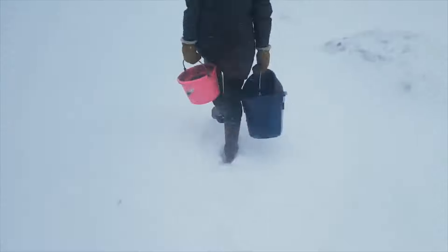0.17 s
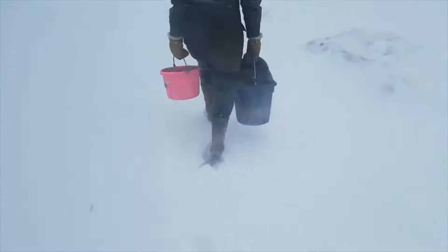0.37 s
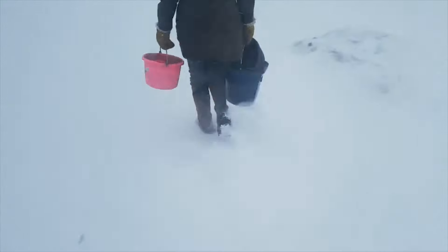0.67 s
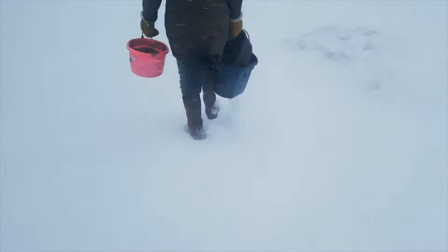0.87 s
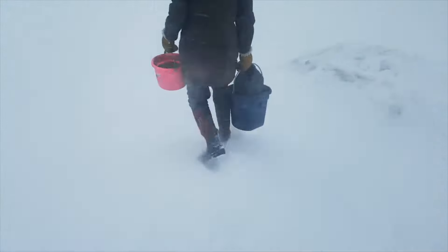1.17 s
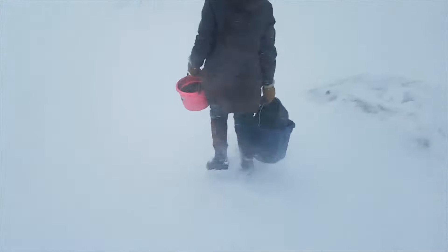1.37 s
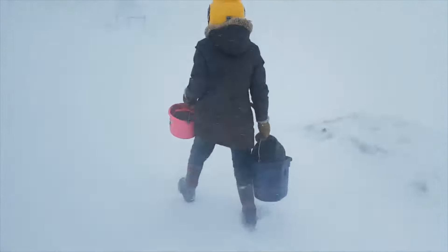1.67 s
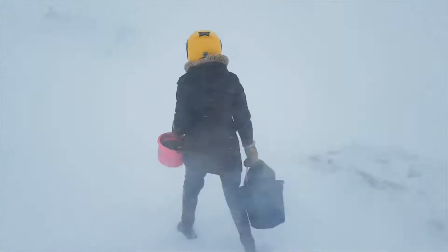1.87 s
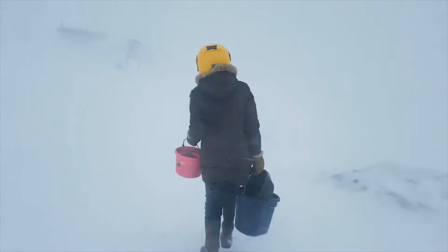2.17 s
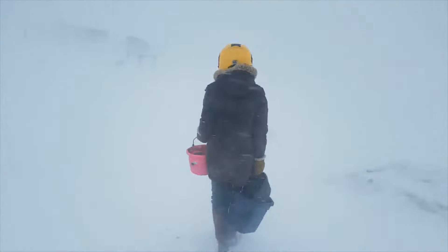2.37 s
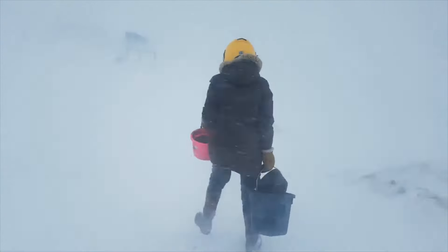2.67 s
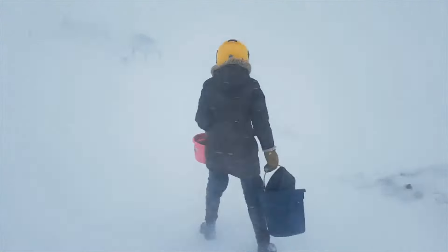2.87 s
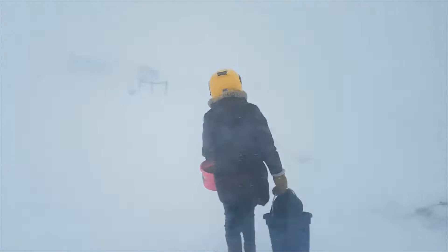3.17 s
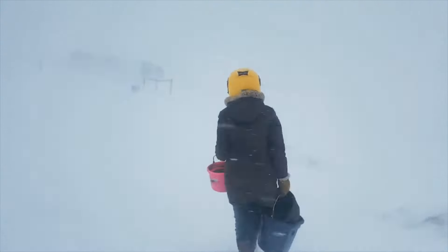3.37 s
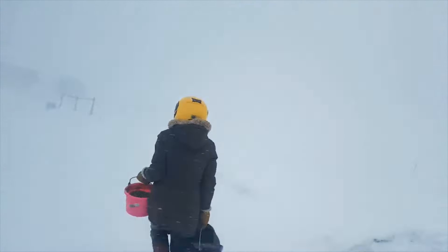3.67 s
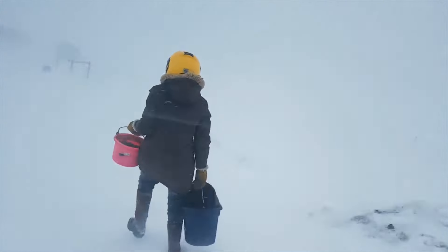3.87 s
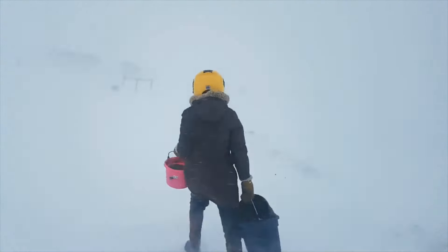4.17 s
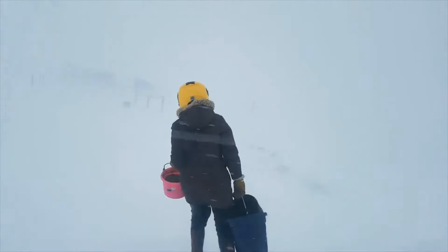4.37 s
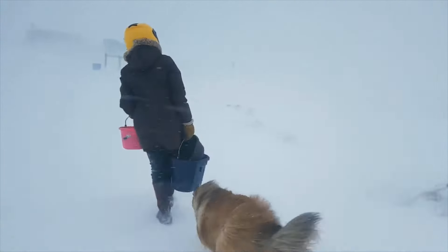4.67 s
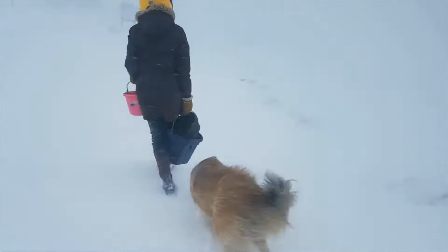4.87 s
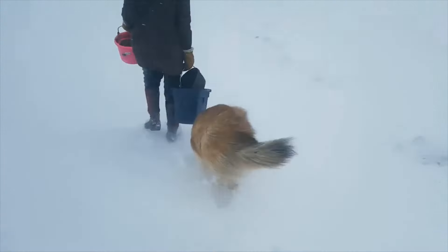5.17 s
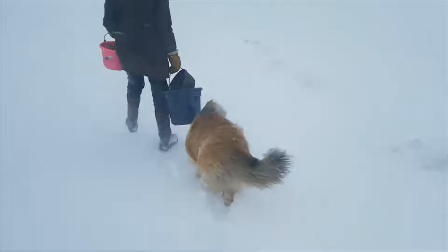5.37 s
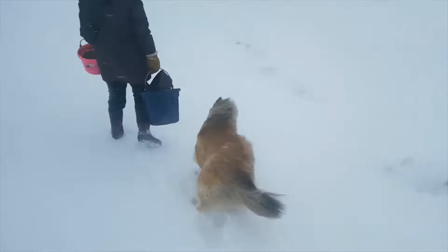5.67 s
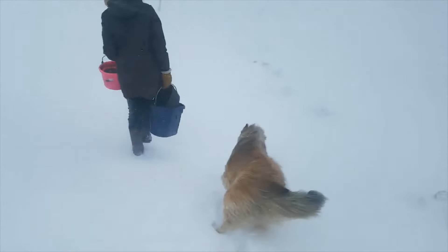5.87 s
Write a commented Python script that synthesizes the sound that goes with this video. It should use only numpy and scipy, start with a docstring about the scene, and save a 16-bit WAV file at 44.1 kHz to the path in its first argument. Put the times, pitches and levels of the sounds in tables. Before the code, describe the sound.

A blizzard blows directly over a stereo microphone in open snow, with no room echo. From 0 seconds, deep wind rumble and a rougher low roar fill both sides. The right is thick and nearly continuous; the left is unrelated, lurching between heavy surges and sudden lulls, such as around 0.3 seconds. Dry snow ticks strike the left, with stronger ones near 0.5 and 0.94. From about 1 to 2.5 seconds a gust tears across the left in ragged, hissing puffs with fizzing fine snow, strongest early, then thinning. Clicks follow near 2.4, with a tiny flurry around 3.3. A shorter gust hisses from 3.7 to 4.1. A heavy low thump of wind swells left near 4.3. More ticks scatter from 4.7 to 5.4. After about 5.5 the left drops back, and the right weakens toward 6 seconds. A very faint snow-drift hiss lies underneath.

```python
"""Deep, restless wind rumble and roar fill both sides as a blizzard blows over two microphone ports.
The right port sits in a steady stream and the left is buffeted unevenly, each with its own noise eddies.
Twice a gust tears across the left port: filtered hiss in ragged puffs, with a fizz of fine snow.
Driven grains tick there as short noise cracks with a pressure kick; drifting snow hisses faintly below."""
import sys
import numpy as np
from scipy import signal
from scipy.fft import rfft, irfft, next_fast_len
from scipy.io import wavfile
from scipy.ndimage import uniform_filter1d

SR = 44100
rng = np.random.default_rng(int(sys.argv[2]) if len(sys.argv) > 2 else 0)


def wav_out(sig):
    """Save sig, one row per channel (or a flat mono array), as 16-bit PCM at SR to the path in sys.argv[1]."""
    wavfile.write(sys.argv[1], SR, np.round(np.clip(np.atleast_2d(sig).T, -1, 1) * 32767).astype(np.int16))


N = 265570
TIME = np.arange(N) / SR

# All table levels are relative; the mix trims them further.
# Wind on each port, large eddies then small: start_s [s], rumble_db [dB], roar_db [dB]
LEFT_WIND = [(0, -17, -22.5), (0.2, -16, -22.5), (0.27, -27, -32), (0.36, -13.5, -19.0), (0.62, -13, -17),
             (0.68, -18.5, -21), (0.82, -13, -19.0), (0.95, -21.5, -24), (1.03, -14, -16.5),
             (1.38, -23, -23), (1.6, -15, -20.5), (2.44, -18.0, -18.5), (2.54, -19, -23.5),
             (2.64, -19, -21), (2.9, -14.0, -22), (3.02, -18.5, -21), (3.4, -13.5, -18.5),
             (3.5, -25.5, -29.5), (3.8, -19, -22), (4.12, -22, -24.0), (4.28, -11.0, -20),
             (4.38, -23.5, -27.5), (4.7, -15.0, -20), (4.78, -24, -28), (4.88, -19, -21),
             (5.23, -20.5, -23.5), (5.32, -14.5, -17), (5.48, -29.5, -36), (5.72, -26, -23),
             (6.02, -27.5, -25.5)]
RIGHT_WIND = [(0, -12.5, -15.0), (0.44, -13, -13), (0.53, -12.5, -17.5), (0.62, -11.0, -13.5),
              (1.55, -9.5, -16.0), (2.15, -11.0, -16.5), (2.65, -11.5, -15.5), (3.1, -12, -17.5),
              (3.33, -16.5, -20), (3.49, -10.5, -16.0), (4.08, -11.5, -16.5), (4.25, -15.5, -18),
              (4.58, -9.0, -16), (4.83, -10.5, -19), (4.91, -12, -17.0), (5.55, -11.5, -17.5),
              (5.65, -20.0, -16.5), (6.02, -24.5, -20)]
# Slow swell of each gust across the left port: start_s [s], hiss_db [dB], brightness_db [dB]
LONG_GUST = [(0.96, -44, 0), (1.0, -27.5, -1), (1.38, -28.5, 6), (1.6, -25, -1), (1.8, -34, 1.5),
             (2.1, -39, 1.5), (2.44, -36, 1), (2.52, -54, 0)]
SHORT_GUST = [(3.66, -46, -1), (3.72, -24.5, -0.5), (3.97, -33, 1.5), (4.06, -34, 0.5), (4.12, -52, 0)]
# Puffs that tear loose: start_s [s], length_s [s] up to the release, hiss_db [dB], spray_db [dB]
PUFFS = [(0.984, 0.13, -17, -25.5), (1.145, 0.039, -16.5, -21.5), (1.231, 0.018, -15.5, -25),
         (1.265, 0.11, -20.5, -25), (1.396, 0.018, -17.5, -29), (1.478, 0.049, -17.5, -34),
         (1.595, 0.11, -21.5, -31), (1.797, 0.03, -24.5, -43), (1.868, .02, -21.5, -38),
         (1.908, 0.027, -22, -38), (2.103, 0.03, -28.5, -41), (2.307, 0.074, -28.5, -38),
         (2.448, 0.023, -21, -42), (3.721, 0.089, -15.5, -40), (3.85, 0.1, -18, -37), (3.97, .02, -22, -55)]
# Single grains and clumps striking the left port: centre_s [s], level_db [dB], decay_s [s]
GRAINS = [(0.06, -5.5, 0.00036), (0.314, -2, 0.00028), (0.5014, 4, 0.00017), (0.8324, -1.5, 0.00083),
          (0.943, 5, .0033), (2.073, 0.5, 0.00092), (2.127, -5, .0003), (2.1877, -3.5, 0.00015),
          (2.426, 3, 0.00051), (2.436, 1.5, 0.00027), (2.746, -5, 0.000081), (2.758, -1, 0.0005),
          (3.083, -5.5, 0.00034), (3.136, -5.5, .0002), (3.212, -8, 0.00018), (3.325, -5, .00025),
          (3.349, -7, .0003), (4.704, -5, 0.0013), (4.9357, -7.5, .0004), (5.088, -7, 0.00015),
          (5.2123, -5.5, 0.0004), (5.311, 1.5, .00026), (5.342, -6, 0.00047), (5.357, -4, 0.00084)]
# Spectrum of the large eddies at each port: pitch_hz [Hz], level_db [dB per Hz]
LEFT_RUMBLE = [(10, -24), (20, -32), (40, -8), (75, 0.5), (150, 0.5), (230, -6), (330, -14), (600, -44),
               (1500, -82)]
RIGHT_RUMBLE = [(10, -36), (20, -22), (40, -10.5), (75, -3), (125, 0.5), (190, -2.5), (280, -11),
                (450, -25.5), (1500, -70)]
# Spectrum of the small eddies at each port: pitch_hz [Hz], level_db [dB per Hz]
LEFT_ROAR = [(40, -25), (160, -6.5), (300, 2.5), (500, -2.5), (1000, -13), (2000, -29), (3500, -41),
             (6000, -54), (16000, -59)]
RIGHT_ROAR = [(40, -9), (160, -4.5), (300, 0.5), (500, -4), (1000, -12.5), (2000, -23), (3500, -35.5),
              (5000, -42.5), (7000, -48), (10000, -51), (13000, -48.5), (16000, -67)]
# Spectrum of the hiss in each gust: pitch_hz [Hz], level_db [dB per Hz]
LONG_HISS = [(150, -5), (500, 0.5), (1000, 3), (2100, 2), (3300, -3.5), (4400, -9.5), (6000, -18.5),
             (9000, -28), (16000, -39)]
SHORT_HISS = [(150, -15), (500, -0.5), (900, 0.5), (1700, 2), (2500, -3.5), (3400, -7), (4600, -15),
              (6500, -26.5), (10000, -33), (16000, -45)]
# Spectrum of fine snow fizzing over the left port: pitch_hz [Hz], level_db [dB per Hz]
FIZZ = [(500, -17), (2000, 6), (4000, 4.5), (7000, -9), (10000, -12), (13000, -8.5), (16000, -15)]
# Tone filter shared by all grain strikes: pitch_hz [Hz], gain_db [dB]
TICK = [(200, 6), (1000, 11), (2500, 9), (5000, -0.5), (10000, -1.5), (14000, 1), (16000, 1)]
# Spectrum of snow drifting along the ground: pitch_hz [Hz], level_db [dB per Hz]
DRIFT = [(200, -4), (1000, 4), (3500, -9), (5000, -9.5), (7000, -18.5), (12000, -15), (16000, -27)]

# Top-treble gain of a grain of the reference length; each doubling of length dulls it
HARD_GRAIN_S, HARD_TREBLE_DB, DULL_DB_PER_DOUBLING = 0.00019, -3.5, -3
# Small grains: typical decay, random level range either way
SMALL_GRAIN_S, SMALL_SPREAD_DB = 0.00023, 3
# Stray grains: level, and how many dB they gain per dB of wind
STRAY_DB, STRAY_FOLLOW = -14.5, 0.61
FLURRY_START_S, FLURRY_LENGTH_S, FLURRY_DB = 3.295, 0.095, -11
EDGE_HZ = 15900  # upper band limit


def buffeting(wind, rumble_spectrum, roar_spectrum, rumble_db, roar_db, surge_db, surge_hz,
              flutter_db, flutter_hz, ride_db, brighten, corner_hz):
    """Large eddies push on a port; small ones ride on them and grow brighter as the wind speeds up."""
    # brief surges and lulls move both sizes of eddy
    large_db, small_db = curves(wind) + surge_db * np.tanh(flutter(surge_hz))
    push = steadied(noise(rumble_spectrum), seconds=0.14)

    # the roar strengthens as the push swings negative
    eddies_db = flutter_db * flutter(flutter_hz) - ride_db * np.tanh(push)
    eddies = evened(gain_of(eddies_db))
    roar = steadied(noise(roar_spectrum), seconds=0.053)
    roar = roar * eddies * gain_of(small_db + roar_db)

    speed_db = small_db - np.median(small_db) + 20 * np.log10(eddies)
    treble_gain = gain_of(brighten * speed_db)
    roar = roar + highs(roar, corner_hz) * (treble_gain - 1)
    return push * gain_of(large_db + rumble_db) + roar


def gust(swell, hiss_db, spectrum, level_db, tear_db, tear_hz, patch_db):
    """Air tears over the rim of the port: a ragged hiss whose upper part flickers by itself."""
    during = (TIME > swell[0][0]) & (TIME < swell[-1][0])
    blowing = uniform_filter1d(during.astype(float), size=400)  # softens both ends
    _, bright_db = curves(swell)
    hiss = noise(spectrum)
    treble_gain = gain_of(bright_db + patch_db * flutter(rate_hz=140))
    hiss = hiss + highs(hiss, corner_hz=2600) * (treble_gain - 1)
    torn = hiss * gain_of(tear_db * flutter(tear_hz))
    return steadied(torn, seconds=0.048) * blowing * gain_of(hiss_db + level_db)


def gust_level(swell, attack_s, release_s):
    """Adds the power of a gust's slow swell and the puffs within it; returns the hiss in dB."""
    swell_db, _ = curves(swell)
    power = gain_of(swell_db) ** 2
    for start_s, length_s, hiss_db, _ in PUFFS:
        if swell[0][0] < start_s < swell[-1][0]:
            shape = puff(start_s, length_s, attack_s, release_s)
            power = power + (gain_of(hiss_db) * shape) ** 2
    return 10 * np.log10(power)


def puff(start_s, length_s, attack_s, release_s):
    """One puff of air rises in a straight line, holds, then dies away exponentially."""
    age = np.maximum(TIME - start_s, 0)
    attack = np.minimum(age / attack_s, 1)
    release = np.exp(-np.maximum(age - length_s, 0) / release_s)
    return attack * release


def spindrift(level_db, follow, spray_db, attack_s, release_s, burst_db, burst_hz):
    """Fine snow fizzes over the left port in tiny bursts, and as a dense spray in each puff."""
    _, roar_db = curves(LEFT_WIND)
    wind_db = roar_db - np.median(roar_db)
    bursts = evened(gain_of(burst_db * np.minimum(flutter(burst_hz), 2.5)))
    flow = bursts * gain_of(level_db + follow * wind_db)
    spray = np.zeros(N)
    for start_s, length_s, _, puff_db in PUFFS:
        spray += gain_of(puff_db + spray_db) * puff(start_s, length_s, attack_s, release_s)
    return noise(FIZZ) * (flow + spray * np.sqrt(bursts))  # spray is less grainy than the flow


def snow_ticks(level_db, knock_db, knock_s):
    """A hard grain gives a dry tick, a loose clump a short spit; each comes with a brief pressure kick."""
    ticks, knocks = np.zeros((2, N))
    t = np.arange(-512, 512) / SR
    strays = scattered(0, N / SR, STRAY_DB, STRAY_FOLLOW, count=18)
    flurry = scattered(FLURRY_START_S, FLURRY_LENGTH_S, FLURRY_DB, 0, count=8)
    for centre_s, db, decay_s in GRAINS + strays + flurry:
        bright_db = HARD_TREBLE_DB + DULL_DB_PER_DOUBLING * np.log2(decay_s / HARD_GRAIN_S)
        crack = rng.standard_normal(len(t)) * np.exp(-abs(t) / decay_s)
        crack = crack / np.linalg.norm(crack)  # equal energy at any length
        crack = coloured(crack, [(5000, 0), (10000, bright_db)])
        add(ticks, centre_s, gain_of(db + level_db) * crack)

        # the kick dips first, then swings back
        u = np.maximum(t, 0) / knock_s
        kick = (t > 0) * (u - 1) * np.exp(-u)
        add(knocks, centre_s, gain_of(db + knock_db) * kick)
    return coloured(ticks, TICK) + knocks


def scattered(start_s, length_s, level_db, follow, count):
    """Small grains land at loose intervals; a follow above zero makes them hit harder in strong wind."""
    place, strength, size = rng.random((count, 3)).T
    times = start_s + length_s * (np.arange(count) + place) / count
    _, roar_db = curves(LEFT_WIND)
    wind_db = np.interp(times, TIME, roar_db - np.median(roar_db))
    db = level_db + follow * wind_db + SMALL_SPREAD_DB * (2 * strength - 1)
    decay_s = SMALL_GRAIN_S * 2 ** (size - 0.5)
    return list(zip(times, db, decay_s))


def ground_drift(level_db):
    """Snow drifting along the ground: a faint steady hiss, independent on each side."""
    return np.array([noise(DRIFT), noise(DRIFT)]) * gain_of(level_db)


def gain_of(db):
    """Decibels to amplitude."""
    return 10 ** (np.asarray(db) / 20)


def evened(x):
    """Scales to an rms of 1."""
    return x / np.sqrt(np.mean(x ** 2) + 1e-20)


def curves(rows):
    """Each column of a table, joined by straight lines over time."""
    s, *columns = np.transpose(rows)
    return [np.interp(TIME, s, column) for column in columns]


def coloured(x, spectrum):
    """Filters x by a spectrum drawn on a log-frequency axis."""
    hz, db = np.transpose(spectrum)
    size = next_fast_len(len(x))
    bins = np.fft.rfftfreq(size, 1 / SR)
    bin_db = np.interp(np.log(bins + 1), np.log(hz), db)
    return irfft(rfft(x, size) * gain_of(bin_db), size)[:len(x)]


def noise(spectrum):
    """Noise of rms 1 with the given spectrum."""
    return evened(coloured(rng.standard_normal(N), spectrum))


def flutter(rate_hz):
    """A random wobble of rms 1 around the given rate, with slow swells held back."""
    size = next_fast_len(N)
    ratio = np.fft.rfftfreq(size, 1 / SR) / rate_hz
    band = ratio / (ratio + 0.2) / (1 + ratio ** 2)
    return evened(irfft(rfft(rng.standard_normal(size)) * band, size)[:N])


def steadied(x, seconds):
    """Evens out the slow swells of a noise by dividing by its running level."""
    size = max(int(seconds * SR), 64)
    power = uniform_filter1d(uniform_filter1d(x ** 2, size), size)
    return x / np.sqrt(power + 1e-12)


def highs(x, corner_hz):
    """The part of x above a gentle corner."""
    sos = signal.butter(1, min(corner_hz, SR / 3), "high", fs=SR, output="sos")
    return signal.sosfiltfilt(sos, x)


def add(mix, centre_s, sound):
    """Mixes a sound in, centred on the given time."""
    start = max(round(centre_s * SR) - len(sound) // 2, 0)
    part = mix[start:][:len(sound)]
    part += sound[:len(part)]


def scene():
    """Two ports with unrelated turbulence, gusts and snow on the left, over the faint ground drift."""
    left = buffeting(LEFT_WIND, LEFT_RUMBLE, LEFT_ROAR, rumble_db=0.4, roar_db=0.0,
                     surge_db=2.0, surge_hz=8.6, flutter_db=2.5, flutter_hz=30.5,
                     ride_db=2.2, brighten=0.83, corner_hz=1200)
    right = buffeting(RIGHT_WIND, RIGHT_RUMBLE, RIGHT_ROAR, rumble_db=1.15, roar_db=0.5,
                      surge_db=0.94, surge_hz=6.7, flutter_db=0.77, flutter_hz=39.4,
                      ride_db=1.6, brighten=0.86, corner_hz=1100)
    long_db = gust_level(LONG_GUST, attack_s=0.013, release_s=0.013)
    short_db = gust_level(SHORT_GUST, attack_s=0.033, release_s=0.0093)
    left = left + gust(LONG_GUST, long_db, LONG_HISS, level_db=3.0,
                       tear_db=2.5, tear_hz=45, patch_db=3.2)
    left = left + gust(SHORT_GUST, short_db, SHORT_HISS, level_db=2.5,
                       tear_db=2.2, tear_hz=60, patch_db=-2.5)
    left = left + spindrift(level_db=-51.5, follow=1.3, spray_db=-2.0, attack_s=0.019,
                            release_s=0.024, burst_db=8.5, burst_hz=110)
    left = left + snow_ticks(level_db=1.2, knock_db=-20, knock_s=0.0006)
    return np.array([left, right]) + ground_drift(level_db=-47)


def record(dry):
    """Rounds off the strongest pushes near full scale, then limits the band."""
    limited = dry / (1 + dry ** 6) ** (1 / 6)
    lowpass = signal.firwin(511, EDGE_HZ, window=("kaiser", 9), fs=SR)
    return signal.oaconvolve(limited, lowpass[None], "same")


dry = scene()
out = record(dry)
wav_out(out)
```